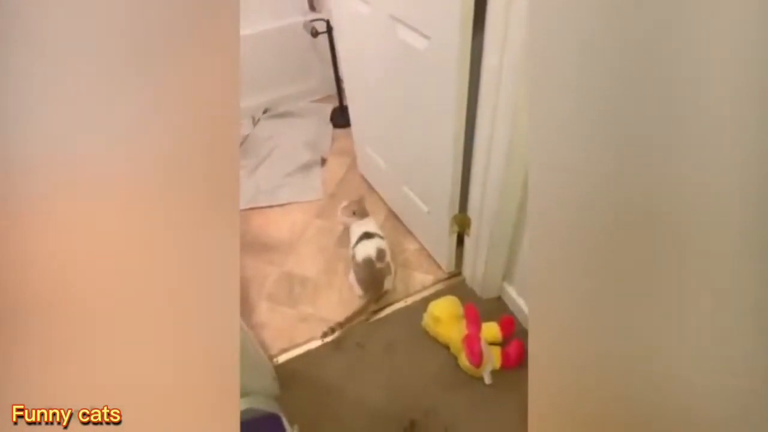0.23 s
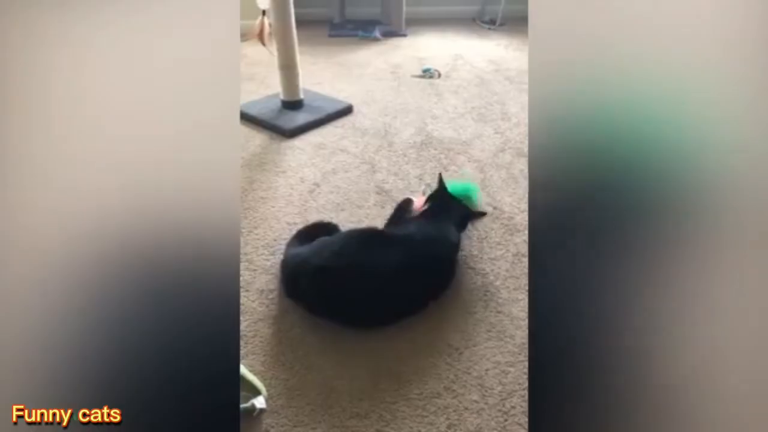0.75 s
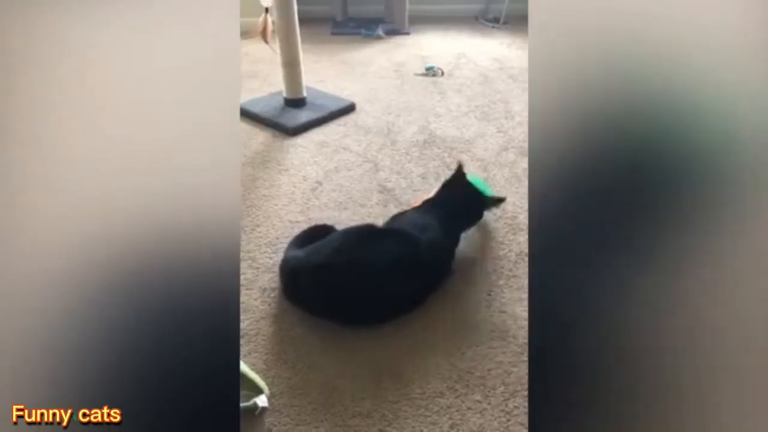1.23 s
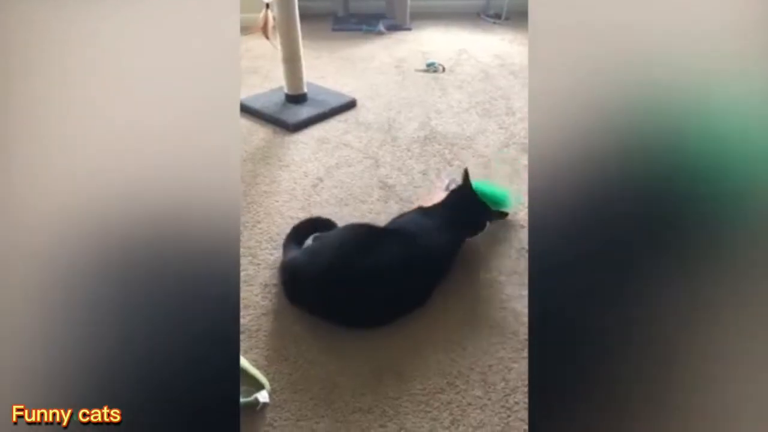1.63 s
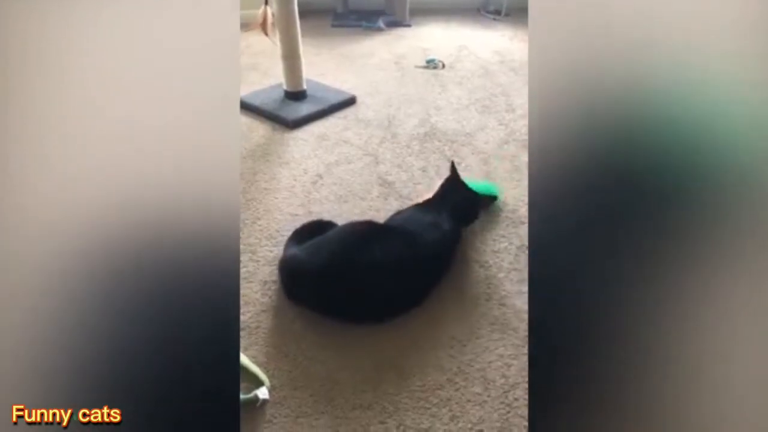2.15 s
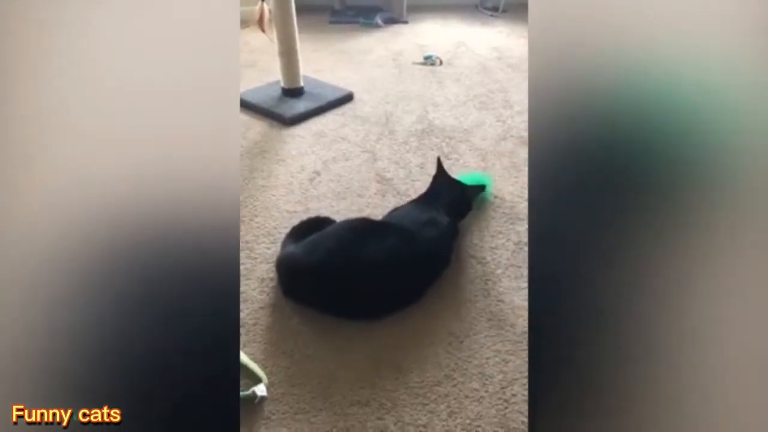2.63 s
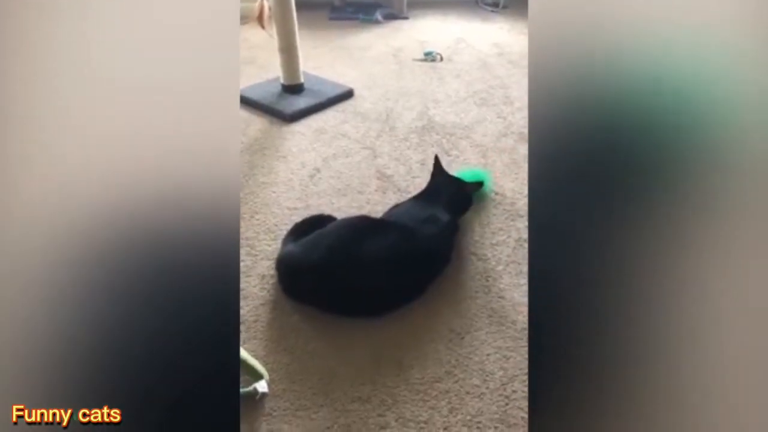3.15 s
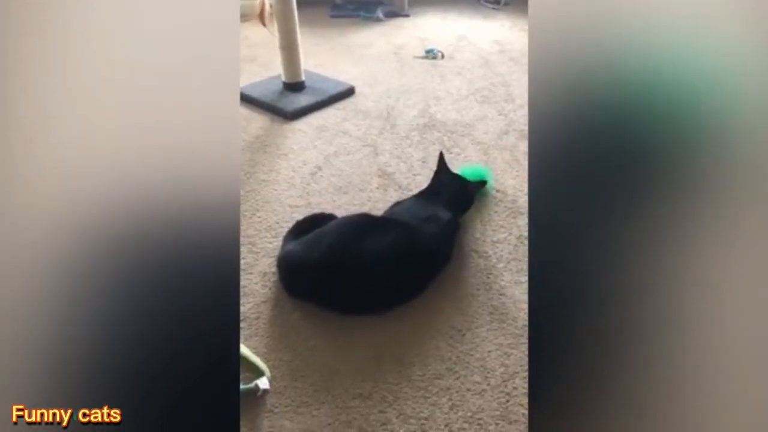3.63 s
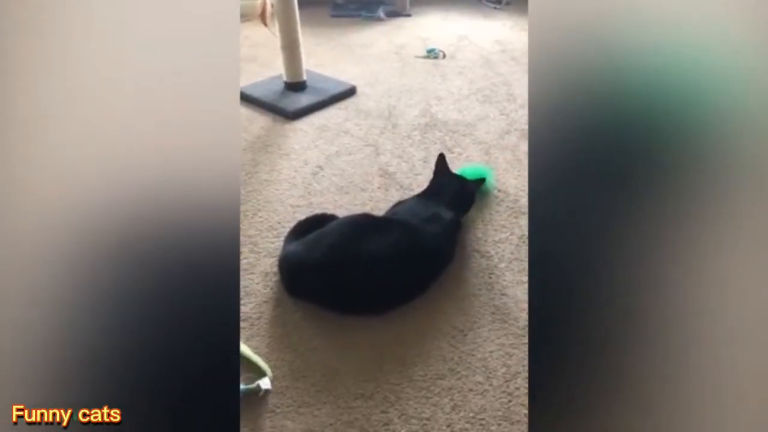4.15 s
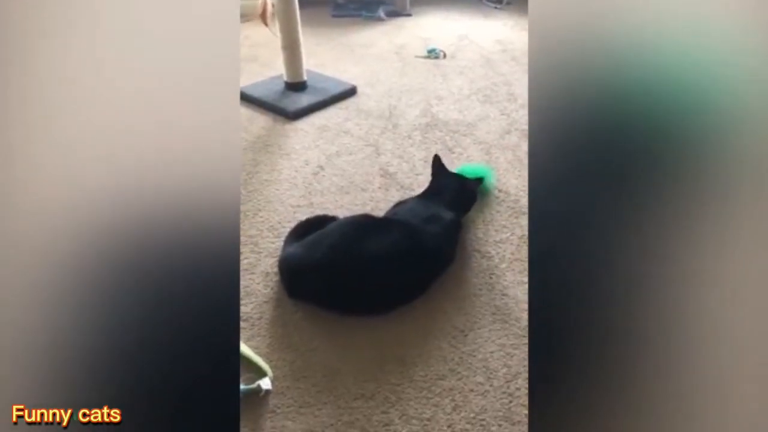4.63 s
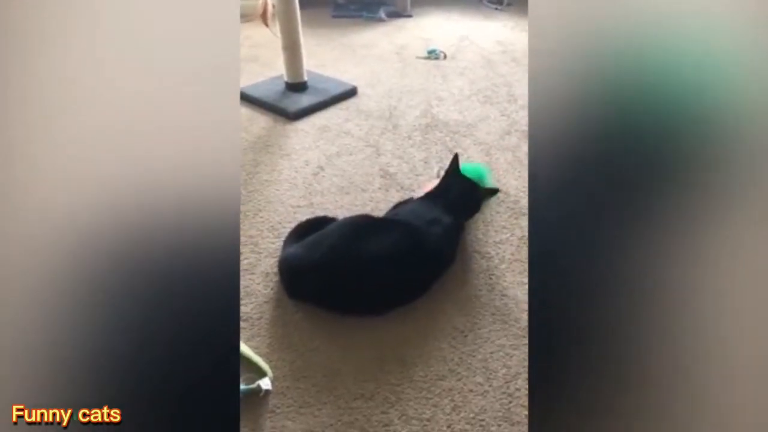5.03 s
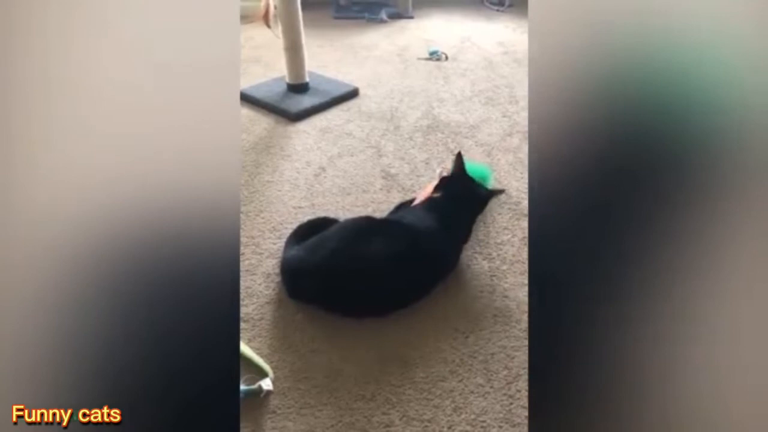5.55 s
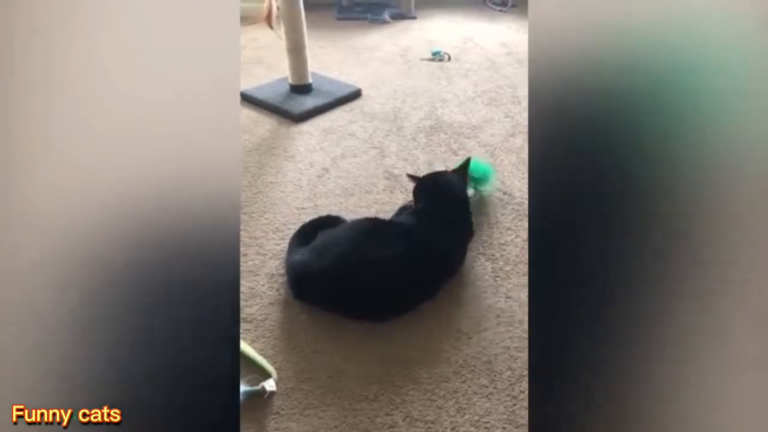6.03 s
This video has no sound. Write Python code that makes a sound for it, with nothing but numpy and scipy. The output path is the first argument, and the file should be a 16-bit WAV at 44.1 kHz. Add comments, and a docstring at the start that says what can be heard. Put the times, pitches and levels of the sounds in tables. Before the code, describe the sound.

Low duct rumble stops abruptly; soft rubbing, claw-plucking pops and dry crinkles follow over faint room hum, thinning out, then picking up at the end.

```python
"""A dull ventilation drone throbs indoors and is cut off abruptly, with a click; then a quiet carpeted room hums.
The drone is noise held in broad duct bands that rise and dip in level, with a thin hiss and whistle on top.
A cat wrestles a stuffed toy on the floor: fur and plush rub the pile as noise full of tiny fibre slips,
claws pluck loops of fabric with falling pops, the toy crinkles in short clicks of band-passed noise,
soft shoves puff in the padded floor, and the walls answer faintly."""
import sys
import numpy as np
from scipy import signal
from scipy.fft import rfft, irfft, next_fast_len
from scipy.io import wavfile
from scipy.ndimage import map_coordinates

SR = 44100
rng = np.random.default_rng(int(sys.argv[2]) if len(sys.argv) > 2 else 0)


def unload_audio(sound):
    """Save the sound as a 16-bit wav file, at the path given as the first command line argument."""
    columns = np.transpose(np.atleast_2d(sound))
    # keep every value between -1 and 1, then stretch to whole-number steps
    steps = np.round(np.clip(columns, -1, 1) * 32767)
    wavfile.write(sys.argv[1], SR, steps.astype(np.int16))


N = 277830  # length in samples
DRONE_END, ROOM_START = 0.636, 0.647  # s, with a short silence between
TOP_HZ = 15200  # upper band limit of everything


def amp(db):
    """Decibels to gain."""
    return 10 ** (np.asarray(db) / 20)


def unit(x):
    """Scaled to rms 1."""
    return x / np.sqrt(np.mean(x ** 2) + 1e-20)


def along(points, hz):
    """Read (Hz, value) points on a log-frequency axis."""
    f, v = np.transpose(points)
    return np.interp(np.log(hz + 1), np.log(f + 1), v)


def curves(rows):
    """One value per sample for each column after the time."""
    s, *cols = np.transpose(rows)
    return [np.interp(np.arange(N) / SR, s, c) for c in cols]


def wobble(rate):
    """A smooth random curve with rate knots a second."""
    knots = rng.standard_normal(int(N * rate / SR) + 4)
    return map_coordinates(knots, [np.arange(N) * rate / SR])


def filtered(x, response):
    """x with its spectrum multiplied by a response of frequency."""
    m = next_fast_len(N + SR // 2)
    spectrum = rfft(x, m) * response(np.fft.rfftfreq(m, 1 / SR))
    return irfft(spectrum, m)[..., :N]


def coloured(x, spectrum):
    """x shaped by a (Hz, dB) spectrum, at rms 1."""
    return unit(filtered(x, lambda hz: amp(along(spectrum, hz))))


def noise():
    """White noise of rms 1."""
    return rng.standard_normal(N)


def spread(mid, side, pan_db):
    """Left and right from a shared and an opposed part; positive pan leans left."""
    left = (mid + side) * amp(pan_db / 2)
    right = (mid - side) * amp(-pan_db / 2)
    return np.array([left, right])


def placed(times, shapes):
    """One row of samples laid down at each time in seconds."""
    at = np.round(np.abs(times) * SR).astype(int)[:, None] + np.arange(shapes.shape[1])
    return np.bincount(at.ravel(), shapes.ravel(), N)[:N]


def resonance(modes, hz):
    """Gain of broad, steep-sided (Hz, width Hz, dB) resonances."""
    return sum(amp(db) / (1 + ((hz - c) / (w / 2)) ** 4) ** 0.76 for c, w, db in modes)


def resonating(modes):
    """Noise of rms 1 held in the resonances."""
    return unit(filtered(noise(), lambda hz: resonance(modes, hz)))


# Spectrum of the room's steady air. Columns: f/Hz, relative level per Hz/dB
AIR = [(25, -42), (42, -20), (52, -0.5), (65, -1), (95, -5.5), (160, -7.5), (240, -6.5), (310, -16.5),
       (500, -20), (750, -25), (1300, -29.5), (2000, -33), (2450, -41.5), (6000, -45), (11500, -56),
       (15000, -73.5)]
HUM_HZ = 119.9
AIR_WAVER_DB, AIR_WAVER_HZ = 1.5, 90  # how far the murk wavers, and below what frequency


def room_tone():
    """An appliance hums at twice the mains rate over the murk of moving air, whose bass wavers."""
    t = np.arange(N) / SR
    hum = amp(.8 * wobble(5)) * np.sin(2 * np.pi * HUM_HZ * t + .13 * wobble(4))
    air = coloured(noise(), AIR)
    bass = filtered(air, lambda hz: hz < AIR_WAVER_HZ)
    wavering_air = air - bass + bass * amp(AIR_WAVER_DB * wobble(7.6))
    return amp(-54.5) * hum + amp(-59.0) * wavering_air


RUMBLE_DB, DUCT_DB, OVERTONE_DB = -40.5, -46, -51  # mid-part levels before rises, dips and panning
# Rises and dips in level of the drone's noise bands, as in any narrow noise.
# Columns: t/s, half-length/s, rumble change in level/dB, duct change in level/dB, overtone change in level/dB
RISES_AND_DIPS = [(0.003, 0.015, 4, 2.5, -14), (0.064, 0.011, 0, 12.5, 4), (0.124, 0.014, -11.5, -6, -5.5),
                  (0.165, 0.015, 3, -0.5, 5.5), (0.21, 0.016, -4, -4, -13), (0.283, 0.0065, 3, 7, 12),
                  (0.324, 0.011, -5.5, -7, 8), (0.37, 0.016, -1.5, 10.5, 9.5),
                  (0.401, 0.015, 9.5, -5, -6.5), (0.418, 0.012, 7.5, 6.5, 16.5), (0.452, 0.011, 3, 10, 5),
                  (0.506, 0.0087, 4, 2.5, 11), (0.547, 0.0066, -1, 6.5, 15.5), (0.568, 0.013, 2.5, 7.5, 2),
                  (0.616, 0.027, -1.5, 2.5, -1.5)]


def band_levels():
    """Levels of rumble, duct and overtone in dB: steady, plus a bell-shaped change at each rise or dip."""
    s, width, rumble, duct, overtone = np.transpose(RISES_AND_DIPS)
    bells = np.exp(-((np.arange(N)[:, None] / SR - s) / width) ** 2)
    return RUMBLE_DB + bells @ rumble, DUCT_DB + bells @ duct, OVERTONE_DB + bells @ overtone


EVENNESS = 0.85  # how far each band's own random swelling is evened out, 0-1


def droning(modes, level_db):
    """Narrow noise of wandering pitch, its random swelling evened out and a given level curve imposed."""
    z = signal.hilbert(resonating(modes))
    evened = z.real / np.abs(z) ** EVENNESS
    both = np.array([evened, evened * amp(level_db)])
    steady, shaped = filtered(both, lambda hz: np.sqrt(resonance(modes, hz)))
    return shaped / steady.std()


# Resonances, all with columns: f/Hz, width/Hz, relative level/dB
# the low boom
RUMBLE = [(26.15, 14, -13), (54, 48, -3), (148, 86, -27)]
# the duct's main resonance
DUCT = [(219, 94, -11), (292, 57, -1)]
# the duct's overtone
OVERTONE = [(438, 86, -4), (520, 63, -19)]
# a muffled hiss of air above them
HISS = [(824, 230, 1.5), (1023, 72, -3.5), (1302, 130, -2)]
# the hiss's thin upper edge, which fades sooner
HISS_EDGE = [(1420, 190, 2), (1786, 720, -8.5)]
# The duct begins to whistle faintly. Columns: t/s, peak level/dB
WHISTLE = [(0.3, -90), (0.41, -69.5), (.46, -67.5), (0.52, -78), (0.63, -72.5)]
WHISTLE_HZ, DUCT_TOP_HZ = 1320, 535
HISS_DB, HISS_FADE_DB_PER_S = -69, 5  # level at the start, and its fade
HISS_EDGE_DB, HISS_EDGE_FADE_DB_PER_S = -80, 16


def drone():
    """Air rumbles in a duct and sounds two broad resonances, under a fading hiss and thin whistle."""
    t = np.arange(N) / SR
    rumble_db, duct_db, overtone_db = band_levels()
    low = spread(droning(RUMBLE, rumble_db), droning(RUMBLE, rumble_db - 13), pan_db=5.5)
    body = sum(spread(droning(modes, db), droning(modes, db - 12), pan_db=-2.2)
               for db, modes in ((duct_db, DUCT), (overtone_db, OVERTONE)))
    body = filtered(body, lambda hz: 1 / (1 + (hz / DUCT_TOP_HZ) ** 30))
    wide_hiss = spread(resonating(HISS), amp(-5) * resonating(HISS), pan_db=0)
    hiss = amp(HISS_DB - HISS_FADE_DB_PER_S * t) * wide_hiss
    edge = amp(HISS_EDGE_DB - HISS_EDGE_FADE_DB_PER_S * t) * resonating(HISS_EDGE)
    whistle = amp(curves(WHISTLE)[0]) * np.sin(2 * np.pi * WHISTLE_HZ * t + .5 * wobble(50))
    sounding = np.clip(np.minimum(t, DRONE_END - t) / .002, 0, 1)  # 2 ms ramps
    # a click at the point where the drone is cut off
    cut_click = amp(-31.5) * np.exp(-np.abs(t - DRONE_END) / 0.0015) * (t < DRONE_END)
    return (low + body + hiss + edge + whistle) * sounding + cut_click


# How long the walls ring. Columns: f/Hz, t60/s
WALLS = [(200, 0.31), (1500, 0.38), (5000, 0.62), (14000, 0.44)]


def walls(x, count=9):
    """A few early reflections and a short diffuse tail whose decay time depends on frequency."""
    hz, t, z = signal.stft(rng.standard_normal(SR // 2), SR, nperseg=256)
    decay = amp(-60 * t / along(WALLS, hz)[:, None])
    build_up = 1 - np.exp(-t / 0.0024)
    tail = signal.istft(z * decay * build_up, SR, nperseg=256)[1]
    tail /= np.linalg.norm(tail)
    reflections = (rng.uniform(.004, .025, count) * SR).astype(int)
    tail[reflections] += 0.22 * rng.choice([-1, 1], count)
    return signal.fftconvolve(x, tail)[:N]


# Paws and body push into the carpet. Columns: t/s, level/dB (lowered 13.5 dB when played)
PUSHES = [(1.119, -52), (1.222, -46), (1.341, -38), (1.67, -49), (2.025, -69), (4.664, -51.5),
          (6.159, -48.5), (6.249, -59)]
# Resonances of the padded floor. Columns: f/Hz, width/Hz, relative level/dB
PAD = [(382, 210, 4), (527, 180, 4)]


def pushes(size=4000):
    """A soft shove sinks into the underlay: a dull puff that swells and fades."""
    s, db = np.transpose(PUSHES)
    u = np.arange(size) / SR / 0.016  # each puff peaks after 16 ms
    puffs = amp(db - 13.5)[:, None] * u * np.exp(1 - u)
    return placed(s, puffs) * resonating(PAD)


# Two bouts of wrestling, body and toy sliding without a break. Columns: t/s, effort level/dB
TUSSLE = [(0.65, -61.5), (0.83, -67), (0.88, -66), (1.0, -62), (1.13, -58), (1.32, -56.5), (1.42, -61.5),
          (1.52, -61.5), (1.58, -64), (2.02, -63.5), (2.11, -71), (2.42, -66.5), (2.56, -76)]
ROLL_OVER = [(5.89, -82), (5.981, -69), (6.138, -65), (6.18, -57.5), (6.29, -57)]
# Short swells of rubbing noise, some of them the ring after a pluck.
# Columns: t/s, length/s, pile level/dB, plush hiss level over the pile/dB
SWELLS = [(0.662, 0.01, -54.5, -8), (0.747, 0.025, -57, -6), (0.937, 0.018, -71, -27),
          (0.991, 0.077, -55.5, -12), (1.349, 0.0099, -49.5, -7.5), (1.606, 0.12, -56, -7.5),
          (1.792, 0.025, -58, 0.5), (1.96, 0.091, -65, 2), (2.322, 0.02, -64, -19),
          (2.51, 0.0098, -64, -20), (2.65, 0.079, -70.5, 1.5), (2.763, 0.01, -68, -3),
          (2.864, 0.041, -68, -8), (3.007, 0.017, -65.5, -9), (3.079, 0.048, -70, -1),
          (3.342, 0.032, -64.5, -9), (3.48, 0.02, -68, -3.5), (4.063, .012, -72, -5),
          (4.183, 0.0088, -68, -21), (4.377, 0.03, -72.5, 4), (4.587, 0.013, -68, -2),
          (4.619, 0.14, -68.5, -4), (4.656, 0.038, -67, -5), (4.766, 0.026, -67.5, 1),
          (4.854, 0.018, -60.5, -5), (5.056, 0.0068, -70.5, 1), (5.428, 0.012, -67.5, -6),
          (5.628, 0.01, -65, -11), (5.678, 0.014, -74, -3), (5.821, 0.064, -67.5, 1.5)]
PILE_DB, PLUSH_DB = 1.5, 0.5  # carpet and plush relative to the effort
ATTACK_S, RELEASE_DB_PER_S = 0.0068, 323  # every swell rises quickly and dies away
FLOOR_DB = -83.5  # effort floor: a constant, very faint rubbing noise under everything


def rubbing_gains():
    """Gains of pile and plush: a floor and the wrestling bouts, plus each swell's attack, hold and release."""
    t = np.arange(N) / SR
    effort = amp(FLOOR_DB) ** 2  # powers add
    for bout in (TUSSLE, ROLL_OVER):
        active = (t > bout[0][0]) * (t < bout[-1][0] + .02)
        effort = effort + amp(curves(bout)[0]) ** 2 * active
    pile, plush = effort * amp(PILE_DB) ** 2, effort * amp(PLUSH_DB) ** 2
    for s, length, db, hiss_db in SWELLS:
        attack = np.clip((t - s) / ATTACK_S, 0, 1)
        swell = attack * amp(db - RELEASE_DB_PER_S * np.maximum(t - s - length, 0))
        pile = pile + swell ** 2
        plush = plush + (swell * amp(hiss_db)) ** 2
    return np.sqrt(pile), np.sqrt(plush)


def pops(hz, cycles, glide, slack_s, size=300):
    """A released fibre swings a few times, its pitch falling as it goes slack: one row for each pitch."""
    t = np.arange(size) / SR
    turns = hz[:, None] * (t + glide * slack_s * (1 - np.exp(-t / slack_s)))
    return np.sin(2 * np.pi * turns) * np.exp(-(turns / cycles) ** 2)


# Spectra of the carpet pile and of the plush. Columns: f/Hz, relative level per Hz/dB
PILE = [(120, -46), (280, -6.5), (550, 3), (900, 3), (1400, 4), (2400, -8.5), (4000, -7.5), (8000, -14),
        (15000, -45)]
PLUSH = [(600, -27.5), (1500, 5), (2800, 3), (5500, 0.5), (8000, -4), (12000, -4.5), (15000, -11)]
CRACKLES_PER_S = 900


def rubbing(count=2600):
    """Fibres of the pile catch and slip; the plush adds a finer, brighter crackle."""
    pile_gain, plush_gain = rubbing_gains()
    when, pitch, size = rng.random((count, 3)).T
    slips = pops(700 * 3.4 ** pitch, cycles=1.33, glide=0.54, slack_s=0.0014)
    signed_size = amp(13.0 * size ** 3)[:, None] * rng.choice([-1, 1], (count, 1))
    slips = placed(when * N / SR, slips * signed_size)
    pile = unit(coloured(noise(), PILE) + unit(slips))
    crackle = noise() * (rng.random(N) < CRACKLES_PER_S / SR)
    plush = unit(coloured(noise(), PLUSH) + amp(-3) * coloured(crackle, PLUSH))
    # the fur sticks and lets go, moving both layers
    grip_db = 1.1 * wobble(80)
    return amp(grip_db - 0.97) * pile_gain * pile + amp(grip_db) * plush_gain * plush


CRINKLE_DB, CLICK_S = 0.5, 0.00024  # trim on every crinkle and tick; decay of the click
FIZZ_DB, FIZZ_S = -29.5, 0.0043  # the fizz under the click, and its decay


def crinkled(s, db, centre, size=500):
    """The toy's skin buckles with a dry click and a short fizz, each in its own two-octave band."""
    t = np.arange(size) / SR
    envelope = np.exp(-t / CLICK_S) + amp(FIZZ_DB) * np.exp(-t / FIZZ_S)
    bursts = rng.standard_normal((len(s), size)) * envelope
    clicks = np.array([signal.lfilter(*signal.butter(1, [hz / 2, min(2 * hz, TOP_HZ)], "band", fs=SR), burst)
                       for hz, burst in zip(centre, bursts)])
    peaks = np.abs(clicks).max(axis=1, keepdims=True)
    return placed(s, clicks * amp(db + CRINKLE_DB)[:, None] / peaks)


# The toy crinkles in the cat's paws and teeth. Columns: t/s, peak level before the trim/dB, centre f/Hz
CRINKLES = [(0.653, -45, 4460), (0.6676, -35.5, 5000), (0.675, -38.5, 6350), (0.707, -44.5, 6500),
            (0.717, -40, 5500), (0.863, -40, 5500), (0.899, -45.5, 4500), (0.912, -52, 4500),
            (0.964, -48.5, 7000), (0.9906, -43.5, 5500), (1.0567, -31.5, 7000), (1.1186, -36.5, 9050),
            (1.1366, -42.5, 10000), (1.183, -51, 5000), (1.2298, -38.5, 6000), (1.2986, -43.5, 10000),
            (1.305, -36, 10100), (1.3124, -36, 6500), (1.4146, -44, 4500), (1.433, -40.5, 7950),
            (1.472, -40.5, 6000), (1.4889, -44.5, 7000), (1.494, -37, 8000), (1.5044, -38.5, 8000),
            (1.5974, -40.5, 8000), (1.6267, -40, 9000), (1.6442, -37, 9000), (1.6905, -39.5, 7500),
            (1.723, -41.5, 5000), (1.729, -41, 5500), (1.8976, -55, 7000), (1.9286, -43.5, 4500),
            (2.0264, -44, 8000), (2.1296, -41, 4260), (2.3682, -48, 6000), (2.38, -44, 6000),
            (2.4405, -55.5, 6000), (2.488, -47.5, 7500), (2.5077, -44, 7440), (2.8311, -58, 6500),
            (3.081, -60.5, 4500), (3.111, -52.5, 8000), (3.2872, -54.5, 4000), (3.3606, -57, 4000),
            (3.365, -57, 3500), (3.403, -46, 6500), (3.4163, -54, 7000), (4.0035, -58.5, 7000),
            (4.078, -60, 6000), (4.1783, -57, 5500), (4.3606, -47.5, 4000), (4.3687, -50, 5000),
            (4.6265, -45.5, 3800), (4.663, -49.5, 3000), (4.6799, -50, 3000), (4.741, -50, 3980),
            (4.779, -58, 5000), (4.8673, -47, 6500), (5.0537, -51, 6040), (5.8254, -58.5, 4000),
            (5.8308, -50, 4500), (5.9577, -47.5, 4000), (5.968, -48.5, 4000), (6.0255, -41.5, 6500),
            (6.0954, -48, 6000), (6.1305, -46, 6000), (6.221, -39, 6000), (6.2388, -44.5, 5500),
            (6.255, -34, 6000), (6.2625, -36, 7000), (6.2775, -32, 5500), (6.2878, -37, 5500)]
TICK_DB, TICK_SPREAD_DB, TICK_HZ = 8, 3, 3800  # peak over the rubbing before the trim, scatter, mid centre


def crinkles(count=240):
    """The clear crinkles, and small dry ticks that grow with the rubbing of the plush."""
    when = rng.uniform(ROOM_START, (N - 1) / SR, count)
    size, pitch = rng.uniform(-1, 1, (count, 2)).T
    rub_db = 20 * np.log10(rubbing_gains()[1][(when * SR).astype(int)])
    tick_db = rub_db + TICK_DB + TICK_SPREAD_DB * size
    ticks = crinkled(when, tick_db, TICK_HZ * 2 ** (pitch / 2))
    return crinkled(*np.transpose(CRINKLES)) + ticks


PLUCK_DB = 0.5  # trim on every pluck and snag
PLUCK_CYCLES, PLUCK_GLIDE, SLACK_S = 1.29, 4.66, 0.00031  # cycles of swing, extra pitch if taut, slackening time
THUD_DB, THUD_HZ, THUD_S = -13.5, 610, 0.0012  # the backing gives: level under the pop, pitch, time to its peak
EDGE_HZ, EDGE_STEEPNESS = 7200, 3.5  # the fabric softens the edge above this; exponent on tautness


def plucked(s, db, hz, taut, size=300):
    """A loop let go pops, falling in pitch, over a small thud; tauter starts higher with a stronger edge."""
    t = np.arange(size) / SR
    taut = np.clip(taut, 0, 1)[:, None]
    turns = hz[:, None] * (t + taut * PLUCK_GLIDE * SLACK_S * (1 - np.exp(-t / SLACK_S)))

    def swell(u):
        """Rises to 1 at u = 1, then dies away."""
        return u * np.exp((1 - u ** 2) / 2)

    pop = np.sin(2 * np.pi * turns) * swell(np.sqrt(2) * turns / PLUCK_CYCLES)
    thud_tone = np.sin(2 * np.pi * (THUD_HZ * t + rng.random(taut.shape)))
    thud = amp(THUD_DB) * thud_tone * swell(t / THUD_S)
    edge = rng.standard_normal(pop.shape) * np.exp(-t / 0.00018) * taut ** EDGE_STEEPNESS
    edge = signal.lfilter(*signal.butter(4, EDGE_HZ, fs=SR), edge)
    return placed(s, (pop + thud + edge) * amp(db + PLUCK_DB)[:, None])


# Claws pluck the fabric. Columns: t/s, pop level before the trim/dB, f once slack/Hz, tautness/0-1
PLUCKS = [(0.6544, -51, 1100, 0.77), (0.6695, -47, 890, 0.63), (0.7328, -52.5, 1100, 0.26),
          (0.7650, -40.5, 845, 0.52), (0.7693, -49, 1090, 0.3), (0.8626, -46, 900, 0.65),
          (0.9272, -43, 1150, 0.16), (0.932, -48, 1050, 0.23), (0.9432, -47, 890, 0.6),
          (0.964, -47, 885, 0.6), (1.0375, -43, 990, 0.45), (1.046, -48, 1100, 0.15),
          (1.0566, -39.5, 1130, 0.58), (1.1496, -41.5, 1000, 0.4), (1.1833, -45, 1000, 0.96),
          (1.1925, -48, 900, 0.7), (1.2301, -38.5, 890, 0.58), (1.3131, -36, 850, 0.78),
          (1.3475, -32.5, 810, 0.56), (1.3574, -42, 910, 0.49), (1.574, -47, 940, 0.3),
          (1.5859, -46.5, 940, 0.3), (1.6490, -42, 980, 0.4), (1.6708, -43.5, 830, 0.14),
          (1.6866, -45, 840, 0.28), (1.694, -44, 845, 0.18), (1.7256, -45, 1300, 0.67),
          (1.7877, -37, 840, 0.93), (1.87, -47.5, 1000, 0.25), (1.9372, -44.5, 1000, 0.42),
          (1.9718, -37.5, 855, 0.69), (1.9885, -47, 1050, 0.6), (2.027, -38.5, 900, 0.75),
          (2.214, -50, 1150, 0.55), (2.2346, -64, 1200, .6), (2.264, -46.5, 1000, 0.5),
          (2.303, -46, 845, 0.43), (2.314, -51, 1400, 0.15), (2.3172, -41, 1050, 0.51),
          (2.3358, -48.5, 1000, 0.12), (2.4668, -49, 1200, 0.46), (2.47, -50, 950, 0.2),
          (2.4838, -48, 900, 0.7), (2.5077, -38, 1170, 0.31), (2.515, -47.5, 1100, 0.29),
          (2.6486, -51, 890, 0.7), (2.6567, -55, 1090, 0.54), (2.678, -61, 1020, 0.6),
          (2.692, -53, 1100, 0.4), (2.7087, -51, 1010, 0.57), (2.771, -54, 990, 0.22),
          (2.8836, -60, 1000, 0.48), (2.889, -52, 905, 0.56), (2.903, -59, 1000, 0.56),
          (2.9517, -52, 900, 0.78), (3.016, -57, 1090, 1), (3.0701, -50, 825, 0.52),
          (3.3215, -51.5, 1010, 1), (3.3474, -37.5, 793, 0.88), (3.3535, -54, 1500, 1),
          (3.357, -51, 1500, 0.6), (3.3615, -44, 1500, 0.8), (3.441, -55, 1400, 0.5), (3.4698, -52, 900, 1),
          (3.4913, -49.5, 1000, 0.66), (4.0037, -52, 920, 0.57), (4.1781, -49.5, 790, 0.88),
          (4.39, -49.5, 890, 0.61), (4.4047, -50, 1080, 0.35), (4.4688, -56, 1000, .3),
          (4.4782, -48.5, 826, 0.8), (4.582, -53, 900, 0.83), (4.591, -50, 1000, 0.73),
          (4.6637, -43.5, 850, 0.97), (4.667, -50, 850, 0.6), (4.6714, -52, 900, .6),
          (4.6801, -47, 850, 0.63), (4.687, -51, 1200, 0.54), (4.6966, -54, 1000, 0.45),
          (4.713, -50, 896, 0.7), (4.7738, -49, 1200, 0.34), (4.7888, -51, 1000, 0.74),
          (4.8554, -45.5, 1140, 0.5), (4.8738, -58, 1090, 1), (4.994, -55.5, 1200, 0.45),
          (5.007, -52.5, 1100, 0.35), (5.0593, -56.5, 1110, 0.95), (5.0763, -58, 1100, .5),
          (5.236, -62, 1000, 0.95), (5.432, -57, 895, 0.9), (5.4427, -54.5, 950, 0.4),
          (5.627, -48.5, 860, 0.52), (5.6326, -61, 1100, 0.33), (5.6832, -59, 1100, 0.7),
          (5.8339, -53, 1000, 0.45), (5.9754, -51, 1100, .6), (6.0015, -50, 1070, 0.35),
          (6.0258, -56, 1000, 0.2), (6.044, -48, 1100, 0.73), (6.096, -52, 1100, 0.45),
          (6.141, -56, 1100, .5), (6.2019, -44, 910, 0.4), (6.2353, -59, 1100, 0.7),
          (6.28, -43, 1000, 0.77), (6.2876, -40, 1000, 0.84)]
SNAG_DB, SNAG_SPREAD_DB = 10.5, 2.5  # faint plucks in between: level over the rubbing before the trim, scatter
SNAG_HZ, SNAG_TAUT = 1130, 0.41  # their middle pitch once slack, and tautness 0-1


def plucks(count=60):
    """The firm plucks, and random snags that grow with the rubbing of the pile."""
    when = rng.uniform(ROOM_START, N / SR, count)
    size, pitch = rng.standard_normal((count, 2)).T
    rub_db = 20 * np.log10(rubbing_gains()[0][(when * SR).astype(int)])
    snag_db = rub_db + SNAG_DB + SNAG_SPREAD_DB * size
    snags = plucked(when, snag_db, SNAG_HZ * np.exp(.25 * pitch), np.full(count, SNAG_TAUT))
    return plucked(*np.transpose(PLUCKS)) + snags


# What the bare walls send back over the carpet. Columns: f/Hz, level/dB
ECHO = [(300, 13), (1000, 0.5), (2500, 3.5), (4500, 2), (10000, 1)]


def scene():
    """The drone, then the cat in its room, straight ahead."""
    rub, claws, toy = rubbing() + pushes(), plucks(), crinkles()
    to_walls = amp(-17.0) * rub + amp(-7.0) * claws + amp(-4.5) * toy
    echo = filtered(walls(to_walls), lambda hz: amp(along(ECHO, hz)))
    in_room = np.arange(N) / SR > ROOM_START
    return drone() + (rub + claws + toy + echo + room_tone()) * in_room


def record(dry):
    """A sharp low-pass: nothing is kept above the band limit."""
    return filtered(dry, lambda hz: hz < TOP_HZ)


dry = scene()
out = record(dry)
unload_audio(out)
```